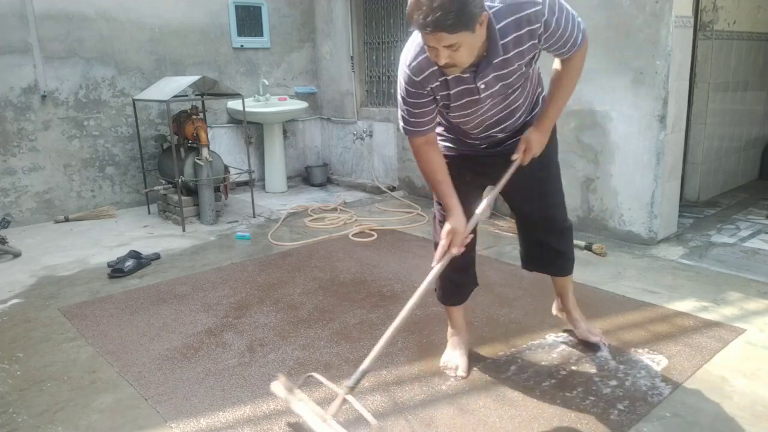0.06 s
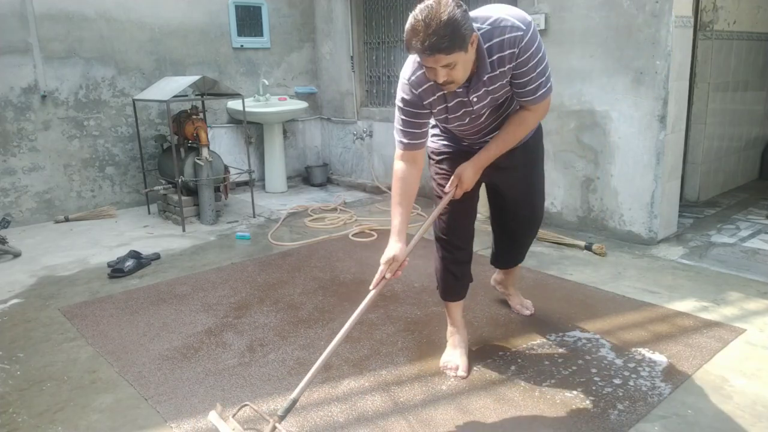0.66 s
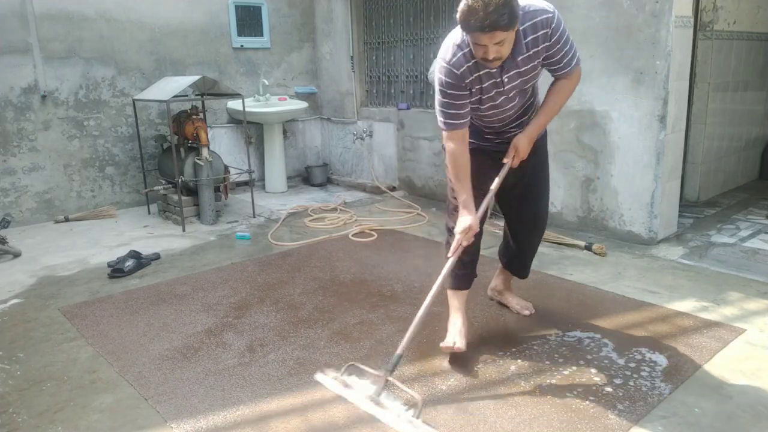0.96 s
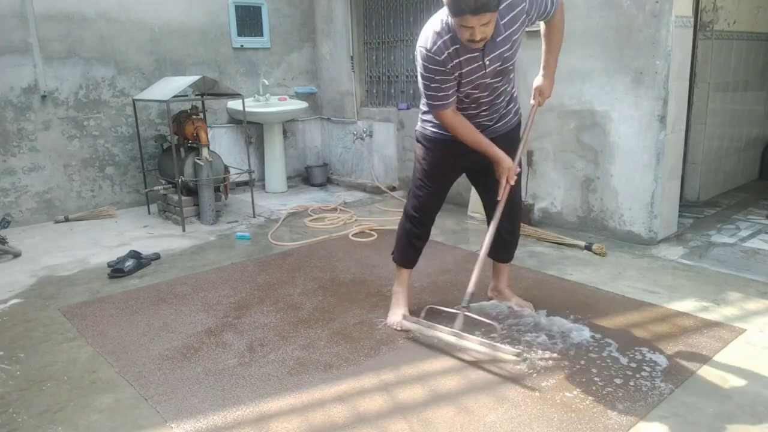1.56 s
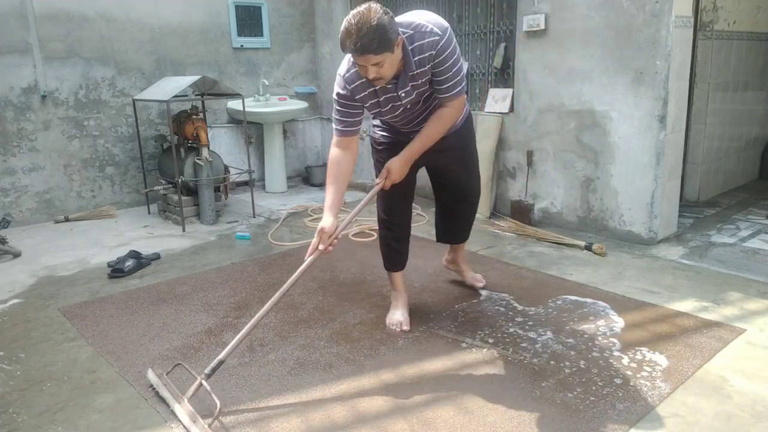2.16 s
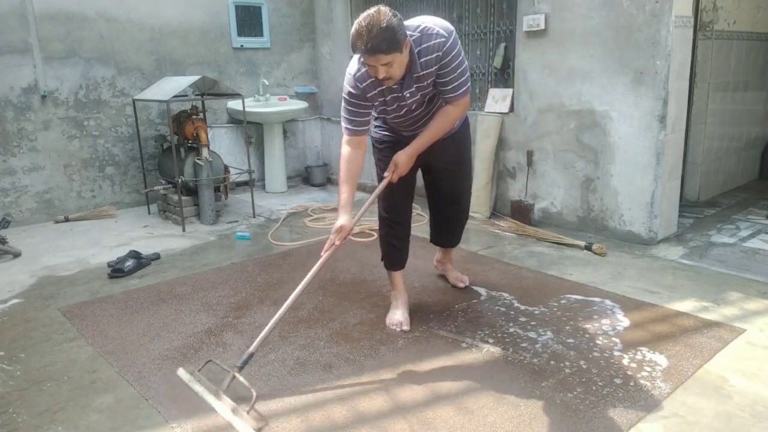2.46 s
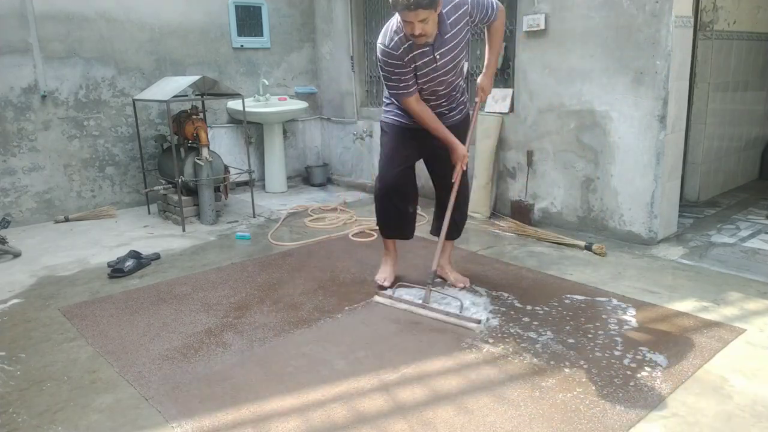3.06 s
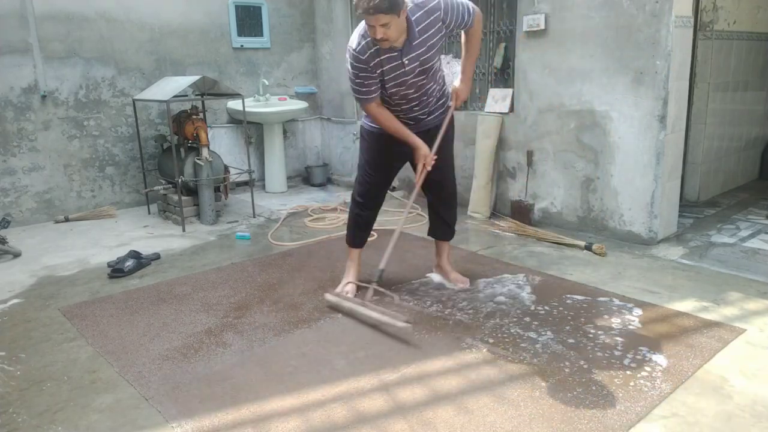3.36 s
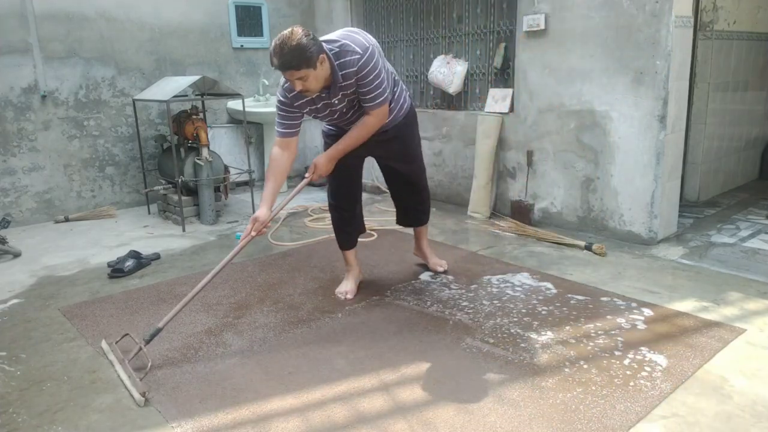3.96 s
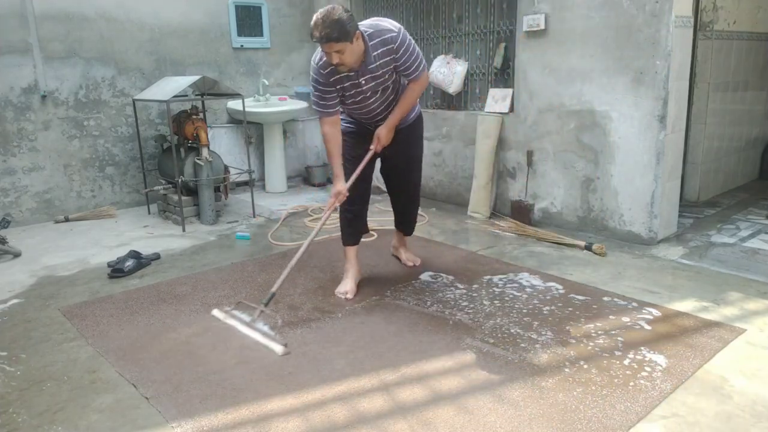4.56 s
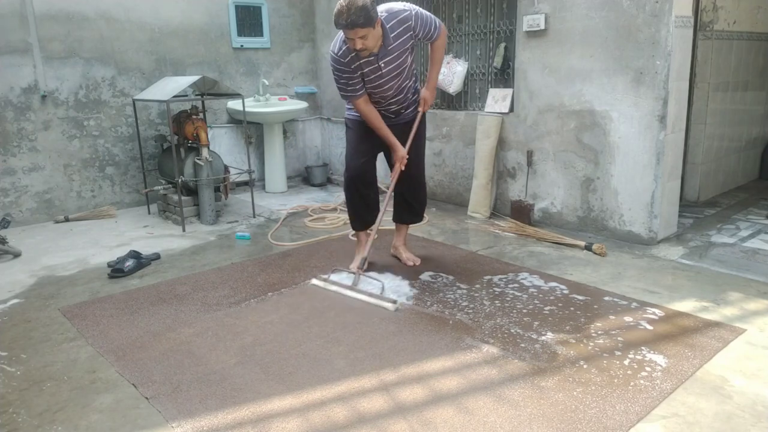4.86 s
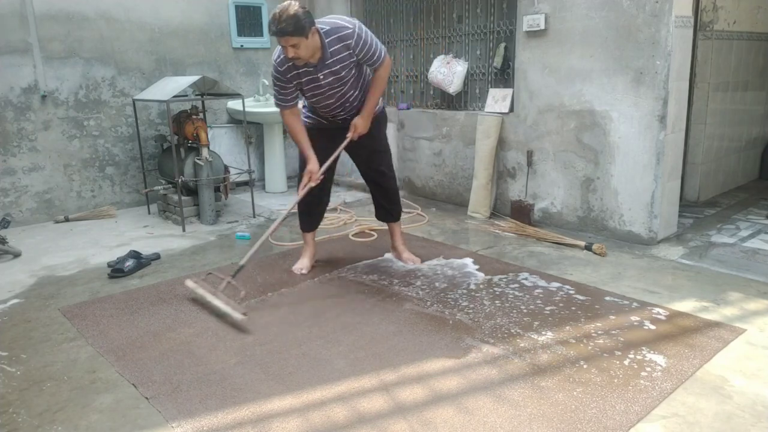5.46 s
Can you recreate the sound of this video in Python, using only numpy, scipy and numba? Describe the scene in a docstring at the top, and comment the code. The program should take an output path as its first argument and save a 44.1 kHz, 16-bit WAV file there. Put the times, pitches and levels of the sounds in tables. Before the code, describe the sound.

Close by in a walled yard, a long-handled rubber squeegee is pulled three times over a soaked carpet. Each stroke swells and eases off, with rasping pile, fizzing foam, gurgling water and a hollow squelch that sinks in pitch. Between strokes, flung drops splat and the head is set down with light wet clacks. A faint outdoor rumble lies far behind.

```python
"""A faint wet brushing dies away and two drops land; then a long-handled rubber squeegee is drawn
three times across a soaked carpet, near the microphone in a walled yard. Each stroke bites, swells
to a crest and eases off: the pile rasps, foam fizzes, water gurgles, the rubber judders, and the
gathering wave gives a hollow note that sinks as it grows. Between strokes the blade lifts, flings
drops and is set down again. The walls answer, and a faint outdoor rumble lies far behind."""
import sys
import numpy as np
from scipy import signal
from scipy.fft import rfft, irfft, next_fast_len
from scipy.io import wavfile
from scipy.ndimage import map_coordinates
from numba import njit

SR = 44100
rng = np.random.default_rng(int(sys.argv[2]) if len(sys.argv) > 2 else 0)


def output_pcm(signal):
    """Save a mono or channel-first signal as 16-bit PCM at the path in sys.argv[1].

    Samples are clipped to [-1, 1] before scaling.
    """
    pcm = np.clip(np.atleast_2d(signal).T, -1, 1) * 32767
    wavfile.write(sys.argv[1], SR, np.round(pcm).astype(np.int16))


N = 251811

# The three pulls, in the foreground: (crest [s], bite before it [s], easing after it [s],
# lift after it [s], attack [s], release [s], pile [dB], foam [dB], wave [dB], gurgle [dB],
# judder [dB], swish [dB], pitch of the empty hollow [ratio], pitch of the filled hollow [ratio])
STROKES = [(1.208, 0.22, .22, 0.35, 0.35, .5, -24.1, -37, -26.4, -34.2, -39.8, -51, 0.91, .96),
           (2.956, 0.34, .232, 0.54, 0.19, .52, -27.8, -38.8, -28.4, -34.5, -43, -41.5, .97, .99),
           (4.852, 0.32, .2, 0.473, 0.35, .5, -25.5, -40, -28, -34, -44.5, -37, 1.094, 1.05)]
# How each sound follows a pull: name -> (attack's end after the bite [s], rise over the attack [dB],
# fall over the release [dB], drop at the lift [dB], swell [dB], its lag after the crest [s], width [s])
ENVELOPES = {"pile": (0.01, 26.5, 25.5, 0.5, 12.5, -0.0248, 0.29), "foam": (0, 26.5, 15, 8, 9, -0.02, 0.25),
             "wave": (0.05, 35, 40.7, 1.6, 15.2, 0.022, 0.15), "gurgle": (0, 13.5, 23, 0, 23, .062, 0.22),
             "judder": (.02, 34, 38, 4, 4.5, .05, 0.34)}

def effort(sound):
    """One sound's gain: it rises to the bite, swells at the crest, eases, and drops at the lift."""
    start, rise_db, fall_db, drop_db, swell_db, lag, width = ENVELOPES[sound]
    gain = np.zeros(N)
    for crest, bite, ease, lift, attack, release, *levels in STROKES:
        t = since(crest)
        db = dict(zip(ENVELOPES, levels))[sound]
        db += rise_db * np.minimum(t + bite - start, 0) / attack
        db += swell_db * (bell(t - lag, width) - 1)
        db += fall_db * np.minimum(ease - t, 0) / release
        db -= drop_db * step(t - lift, width=0.0045)
        gain += amp(db)
    return gain

def swish(width_s=0.045):
    """The gain of the first thin water squeezed out as the blade bites."""
    return sum(amp(db) * bell(since(crest - bite), width_s) for crest, bite, *_, db, _, _ in STROKES)

# The carpet's rasp, pressed hard and lightly brushed: (frequency [Hz], level [dB])
PRESSED_PILE = [(700, -60), (1200, -11), (1700, -8), (2080, -2.5), (2600, -0.5), (3100, 0.5), (3650, -2),
                (4000, -6), (4500, -18), (5500, -28), (6500, -25), (8500, -30), (14000, -120)]
BRUSHED_PILE = [(350, -39), (600, -3.5), (697, 3.5), (876, -1), (1020, -3), (1150, -4.5), (1320, -2.5),
                (2420, 0.5), (5600, -19.5), (6500, -27), (8450, -49), (14300, -120)]

def pile(level, slip, clump_db=1.11, firm_db=-39, ring_share=0.59, damping=0.081):
    """Wet tufts flick from under the blade; pressed firmly, they ring the hollow's upper resonances."""
    _, second, third = hollow()
    flicks = lambda: grains(rate=4500, spread_db=5)
    ring = unit(sum(ringing(flicks(), hz, damping) for hz in (second, third, 1.302 * third)))
    pressed = blend(coloured(flicks(), PRESSED_PILE), coloured(ring, PRESSED_PILE), ring_share)
    brushed = coloured(grains(rate=7000, spread_db=0.5), BRUSHED_PILE)
    firmness = 1 / (1 + (amp(firm_db) / (level + 1e-9)) ** 3)
    return level * unit(amp(clump_db * slip)) * blend(brushed, pressed, firmness)

# The hollow ahead of the blade: (empty [Hz], filled [Hz], half filled before the crest [s],
# filling time [s], sag after the crest [octaves/s], tracking of the stroke's pitch ratio [exponent])
HOLLOW_MODES = [(1696, 610, .157, .05, 0.64, .1), (2840, 2108, 0.21, .065, 0.15, 1.2),
                (3870, 3008, 0.13, 0.052, .5, 1.15)]

def hollow():
    """Three pitch curves that sink as water piles up and start afresh with each stroke."""
    crests, *_, empty_ratio, filled_ratio = np.transpose(STROKES)
    nearest = np.abs(since(crests[:, None])).argmin(axis=0)
    t = since(crests[nearest])
    pitches = []
    for empty_hz, filled_hz, lead, filling, sag, tracking in HOLLOW_MODES:
        high = empty_hz * empty_ratio[nearest] ** tracking
        low = filled_hz * filled_ratio[nearest] ** tracking
        filled = step(t + lead, filling)
        pitches.append(high * (low / high) ** filled * 2 ** (-sag * np.maximum(t, 0)))
    return pitches

# Water spilling over: (frequency [Hz], level [dB])
SLOSH_SPECTRUM = [(250, -59), (420, -7), (540, 5.5), (830, 0.5), (1150, -9.5), (1700, -26), (2400, -16),
                  (4000, -55)]

def wave(level, slip, damping=0.29, slosh_share=0.33, bubble_share=0.23, clump_db=-0.64, deep_hz=650):
    """Water squelches into the hollow before the blade, whose note falls as the wave piles up."""
    hz = hollow()[0] * (1 + 0.028 * wobble(30))
    squelch = grains(rate=2500, spread_db=4.5) * amp(clump_db * slip)
    note = ringing(squelch, hz, damping)
    note = unit(ringing(note, hz, 2.3 * damping) * np.sqrt(hz))
    note = blend(note, bubbles(hz, rate=200, cycles=10.3, scatter=0.171), bubble_share)
    slosh = coloured(grains(rate=1500, spread_db=3), SLOSH_SPECTRUM)
    depth = np.minimum(deep_hz / hz, 1) ** 2  # only a deep wave sloshes over
    return level * blend(note, slosh, slosh_share * depth)

# Water down in the carpet's backing: (frequency [Hz], level [dB])
GURGLE_SPECTRUM = [(130, -35), (200, -0.5), (260, 0.5), (370, 0), (440, -10), (600, -10), (1000, -60)]

def gurgle(level, slip, clump_db=0.7, pocket_hz=320, bubble_share=0.13):
    """Water wells up out of the backing with larger pockets of air."""
    welling = coloured(grains(rate=900, spread_db=0.5) * amp(clump_db * slip), GURGLE_SPECTRUM)
    pockets = bubbles(np.full(N, pocket_hz), rate=110, cycles=9.6)
    return level * blend(welling, pockets, bubble_share)

def bubbles(hz, rate, cycles, scatter=0.219, rise=0.094):
    """Air pockets ring around the pitch curve hz, each rising slightly as it fades."""
    start = np.flatnonzero(rng.random(N) < rate / SR)[:, None]
    detune, size = rng.standard_normal((len(start), 2)).T[:, :, None]
    t = np.arange(SR // 12) / SR
    turns = hz[start] * np.exp(scatter * detune) * t
    age = turns / cycles
    envelope = amp(2 * size) * np.exp(-age) * (1 - np.exp(-turns))
    envelope *= np.cos(np.pi / 2 * t / t[-1])  # each pocket dies away without a click
    ring = envelope * np.sin(2 * np.pi * turns * (1 + rise * age / (1 + age)))
    samples = start + np.arange(len(t))
    return unit(np.bincount(samples.ravel(), ring.ravel(), N)[:N])

# The fizz at the blade: (frequency [Hz], level [dB])
FOAM_SPECTRUM = [(2650, -19), (4500, -3), (5750, -8), (6680, -9), (8900, 1), (11900, -15.5), (13300, -21),
                 (14900, -25), (15600, -22)]

def foam(level, slip, clump_db=0.65):
    """Soap bubbles burst along the rubber edge."""
    return level * coloured(grains(rate=16000, spread_db=3) * amp(clump_db * slip), FOAM_SPECTRUM)

# Low drumming at ground level: (frequency [Hz], level [dB])
JUDDER_SPECTRUM = [(30, -50), (50, -43), (80, -20), (115, -15.5), (150, 1), (185, -9.5), (240, -30),
                   (400, -32)]

def judder(level, slip, clump_db=-4.2):
    """The loaded rubber sticks and slips, drumming on the carpet."""
    return level * coloured(grains(rate=700, spread_db=2.5) * amp(clump_db * slip), JUDDER_SPECTRUM)

# The water's sound dips briefly in mid-stroke: (time [s], depth [dB], width [s])
WATER_DIPS = [(1.265, 5, 0.042), (4.95, 10, 0.042)]

def squeegee(idle_pile_db=-67, idle_foam_db=-76, fading_db=13, fading_db_per_s=87, wave_dip_share=0.73):
    """One uneven slipping of the blade drives every sound; between strokes it barely brushes the pile."""
    idle = 1 + amp(fading_db - fading_db_per_s * clock())  # an earlier stroke dies away at the start
    dip_db = sum(depth * bell(since(s), width) for s, depth, width in WATER_DIPS)
    slip = unit(wobble(130) + 0.32 * wobble(35) + 0.5 * wobble(14))
    out = pile(np.hypot(effort("pile"), amp(idle_pile_db) * idle), slip)
    out += foam(np.hypot(effort("foam"), amp(idle_foam_db) * idle), slip)
    out += wave(np.hypot(effort("wave"), swish()) * amp(-wave_dip_share * dip_db), slip)
    out += gurgle(effort("gurgle") * amp(-dip_db), slip)
    return out + judder(effort("judder"), slip)

# The head lands, or its rubber flicks free: (time [s], thud level [dB], clack level [dB])
KNOCKS = [(1.701, -42, -32), (1.707, -40, -29), (2.373, -28.5, -36.5), (3.338, -59, -28),
          (3.3768, -47, -23.5), (3.403, -52, -28.5), (5.272, -54.5, -28), (5.28, -35.5, -26)]
# The head's low modes: (frequency [Hz], level [dB], t60 [s])
HEAD_MODES = [(193, -0.5, 0.051), (247, 0.5, 0.052), (334, -1.5, 0.037), (420, -5.5, 0.038),
              (740, -8, 0.011), (1450, -0.5, 0.027)]
# The slap of wet rubber: (frequency [Hz], level [dB])
CLACK_SPECTRUM = [(300, -17), (900, -12.5), (1800, 2), (2450, 2), (3100, -4), (4500, -14), (6500, -42),
                  (9000, -14), (15000, -42)]

def knocks(clack_t60=0.037, low_cut_hz=170, contact_s=0.001):
    """A blow wakes the low modes of the head, and the wet rubber slaps with a short clack."""
    out, t = np.zeros(N + SR), np.arange(SR // 5) / SR
    hz, db, t60 = np.transpose(HEAD_MODES)[:, :, None]
    low_cut = signal.butter(2, low_cut_hz, "high", fs=SR, output="sos")
    for s, thud_db, clack_db in KNOCKS:
        decays = amp(db + rng.normal(0, 1, hz.shape) - 60 * t / t60)
        thud = (decays * np.sin(2 * np.pi * hz * t)).sum(0)
        thud *= 1 - np.exp(-t / contact_s)  # the carpet cushions the blow
        thud = signal.sosfilt(low_cut, thud)  # a small head radiates no deep bass
        clack = coloured(rng.standard_normal(len(t)), CLACK_SPECTRUM) * amp(-60 * t / clack_t60)
        out[round(s * SR):][:len(t)] += peaking(thud, thud_db) + peaking(clack, clack_db)
    return out[:N]

# Flung water landing in the yard: (time [s], relative level [dB])
DROPS = [(0.517, -47), (0.547, -44.5), (1.701, -35.5), (1.706, -37), (1.721, -35), (2.194, -54),
         (2.373, -36), (3.5485, -46), (3.7793, -54), (3.8332, -50), (4.0761, -52), (4.104, -49),
         (5.407, -35.5), (5.4184, -40.5), (5.526, -47), (5.6396, -51)]
# One splat: (frequency [Hz], level [dB])
SPLAT_SPECTRUM = [(800, -25), (2500, -1), (5000, -4), (9000, 4), (15000, -4.5)]

def drops(t60=0.026, gain_db=2, spray_db=-21, spray_t60=0.22):
    """Each drop lands with a short bright splat, and finer spray patters after it."""
    out, t = np.zeros(N + SR), np.arange(SR // 8) / SR
    for s, db in DROPS:
        impact = rng.standard_normal(len(t)) * amp(-60 * t / t60)
        spray = grains(rate=2000, spread_db=1)[:len(t)] * amp(spray_db - 60 * t / spray_t60)
        splat = coloured(impact + spray, SPLAT_SPECTRUM)
        out[round(s * SR):][:len(t)] += peaking(splat, db + gain_db)
    return out[:N]

# Light wet scuffs nearby, and faint tones far off:
# (time [s], level [dB], width [s], frequency [Hz], nominal bandwidth [Hz])
SCUFFS = [(.01, -51.5, 0.011, 1510, 1800), (.095, -46.5, 0.038, 1060, 1300), (.63, -54.5, 0.034, 745, 300),
          (.61, -58, 0.048, 170, 150), (.61, -61, 0.057, 2400, 1700), (1.7, -51.5, 0.05, 2078, 1400),
          (2.05, -65, 0.089, 2670, 1800), (2.342, -55, 0.01, 2870, 1000), (5.27, -43.5, 0.023, 2000, 1510),
          (3.36, -40.5, 0.043, 2353, 900), (4.08, -56.5, 0.038, 1390, 1790), (4.3, -66.5, 0.19, 3570, 300)]
FAR_TONES = [(3.89, -53, 0.059, 817, 90), (4.06, -53, 0.074, 837, 110), (5.36, -53, 0.059, 1347, 130),
             (5.58, -55, 0.06, 1316, 100)]

def swells(rows):
    """Short swells of noise, each in one resonance: a broad one scuffs, a narrow one gives a tone."""
    out = np.zeros(N)
    for s, db, width_s, hz, bandwidth in rows:
        band = filtered(rng.standard_normal(N), lambda f: resonance(f, hz, 0.89 * bandwidth) ** 2)
        out += amp(db) * bell(since(s), width_s) * unit(band)
    return out

# Reverberation between the yard's walls: (frequency [Hz], t60 [s])
WALL_DECAY = [(150, 0.37), (1000, 0.77), (3000, 0.24), (9000, 0.23), (15000, 0.36)]

def yard(x, wet_db, delay_s):
    """The plastered walls answer just after the direct sound; the treble dies first."""
    hz, t, spectra = signal.stft(rng.standard_normal(SR // 2), SR, nperseg=256)
    decay = amp(-60 * t / along(WALL_DECAY, hz)[:, None])
    tail = signal.istft(spectra * decay, SR, nperseg=256)[1]
    tail = np.pad(tail / np.linalg.norm(tail), (int(delay_s * SR), 0))
    reflections = amp(wet_db) * signal.fftconvolve(x, tail)[:N]
    return (x + reflections) / np.hypot(1, amp(wet_db))

# The open air behind the work: (frequency [Hz], level [dB])
AIR_SPECTRUM = [(15, -75), (25, -45), (59, -16.5), (94, 1), (240, -2), (267, -10.5), (306, -3), (411, -8),
                (568, -6), (785, -8.5), (1420, -7), (2430, -16), (3550, -23), (5460, -38), (15600, -39)]
# Humps in the distant drone: (frequency [Hz], bandwidth [Hz], level [dB])
DRONE_HUMPS = [(158, 190, -11.5), (710, 215, 0), (1340, 84, -8), (1575, 17, 2.5)]

def outdoors(level_db=-51.5, air_db=-1, drone_db=-6):
    """A steady far rumble with a few resonant humps."""
    air = coloured(rng.standard_normal(N), AIR_SPECTRUM)
    humps = lambda f: sum(amp(db) * abs(resonance(f, hz, width)) ** 2 for hz, width, db in DRONE_HUMPS)
    drone = unit(filtered(rng.standard_normal(N), humps))
    return amp(level_db + 0.18 * wobble(16)) * (amp(air_db) * air + amp(drone_db) * drone)

def amp(db):
    """Decibels to gain."""
    return 10 ** (np.asarray(db) / 20)

def unit(x):
    """Scale to rms 1."""
    return x / np.sqrt(np.mean(x ** 2) + 1e-20)

def peaking(x, db):
    """Scale to a peak of db."""
    return amp(db) * x / np.abs(x).max()

def blend(a, b, share):
    """Mix two unrelated sounds; share is the power given to b."""
    share = np.clip(share, 0, 1)
    return np.sqrt(1 - share) * a + np.sqrt(share) * b

def clock():
    """The time of every sample."""
    return np.arange(N) / SR

def since(s):
    """Seconds since the moment s, for every sample."""
    return clock() - s

def step(t, width):
    """A smooth rise from 0 to 1 around t = 0."""
    return .5 + .5 * np.tanh(.5 * t / width)

def bell(t, width):
    """A Gaussian hump of height 1 at t = 0."""
    return np.exp(-.5 * (t / width) ** 2)

def wobble(rate):
    """A smooth random curve, rate knots a second."""
    return map_coordinates(rng.standard_normal(int(N * rate / SR) + 4), [clock() * rate])

def grains(rate, spread_db):
    """Tiny impulses of unequal size at random moments, about rate a second."""
    hit = rng.random(N) < rate / SR
    size = amp(spread_db * np.clip(rng.standard_normal(N), -2, 2))
    return unit(hit * size * np.sign(rng.standard_normal(N)))

def along(points, hz):
    """(Hz, value) points read on a log axis."""
    f, values = np.transpose(points)
    return np.interp(np.log(hz + 1), np.log(f + 1), values)

def filtered(x, response):
    """x with its spectrum multiplied by a response of frequency."""
    size = next_fast_len(len(x) + 8192)
    return irfft(rfft(x, size) * response(np.fft.rfftfreq(size, 1 / SR)), size)[:len(x)]

def coloured(x, spectrum):
    """x shaped by (Hz, dB) points, at rms 1."""
    return unit(filtered(x, lambda hz: amp(along(spectrum, hz))))

def resonance(f, hz, width):
    """Response of one damped mode."""
    return 1j * f * width / (hz * hz - f * f + 1j * f * width)

def ringing(x, hz, damping):
    """x ringing in a resonance that follows the pitch curve hz, at rms 1."""
    return unit(glide(x, 2 * np.sin(np.pi * hz / SR), damping))

@njit
def glide(x, tune, damping):
    """A resonator whose frequency moves from sample to sample."""
    out = np.zeros(len(x))
    low = band = 0.
    for i in range(len(x)):
        low += tune[i] * band
        band += tune[i] * (x[i] - low - damping * band)
        out[i] = band / np.sqrt(tune[i])
    return out

def scene():
    """In mono: the strokes close and fairly dry, drops and knocks with more wall, the rumble far off."""
    strokes = squeegee()
    impacts = yard(drops() + knocks(), wet_db=-4, delay_s=0.021)
    strokes = yard(strokes, wet_db=-11.5, delay_s=0.009)
    return (strokes + impacts + swells(SCUFFS) + swells(FAR_TONES) + outdoors())[None]

def record(dry, top_hz=15650):
    """The microphone is a phone's, and the phone keeps nothing above its band limit."""
    return np.array([filtered(x, lambda hz: hz < top_hz) for x in dry])

dry = scene()
out = record(dry)
output_pcm(out)
```